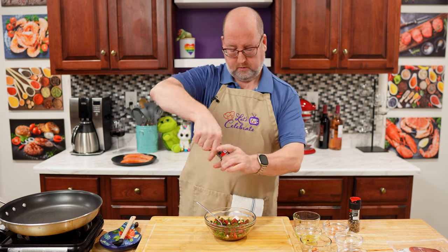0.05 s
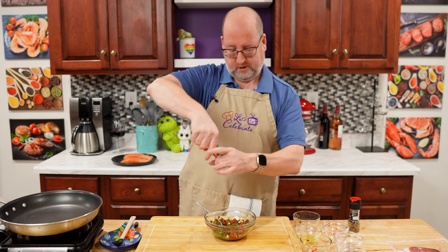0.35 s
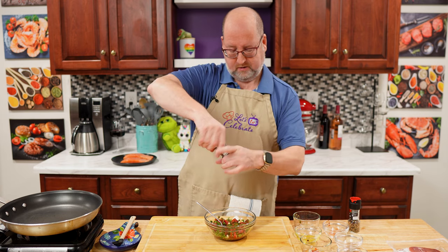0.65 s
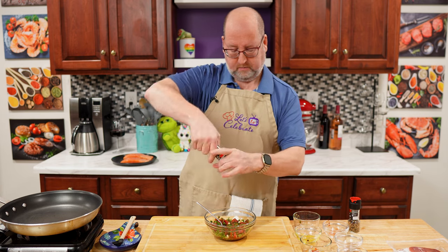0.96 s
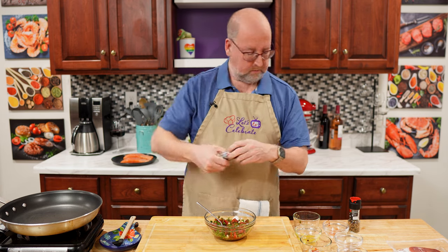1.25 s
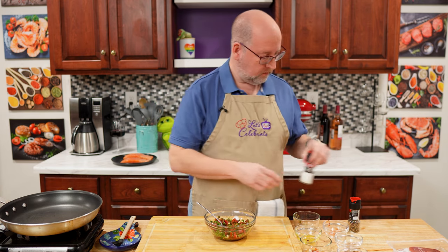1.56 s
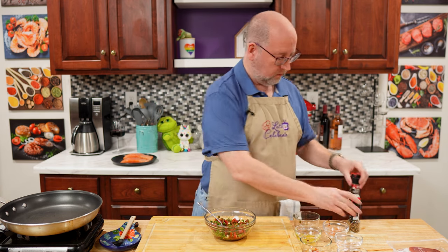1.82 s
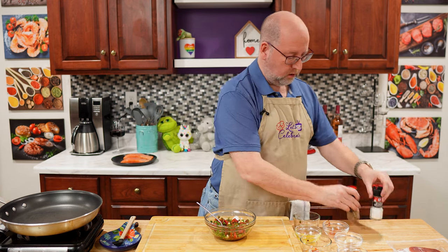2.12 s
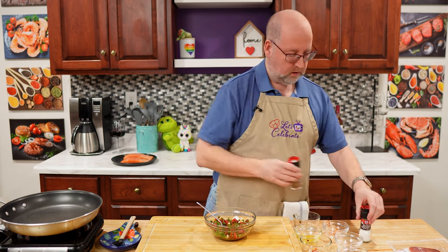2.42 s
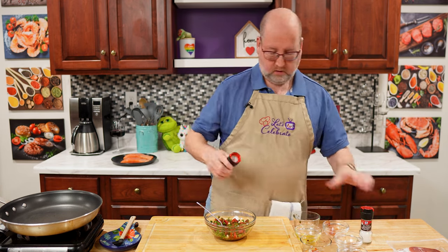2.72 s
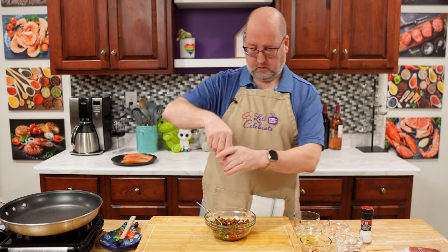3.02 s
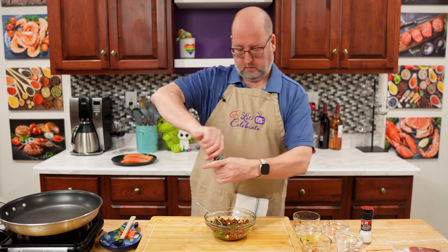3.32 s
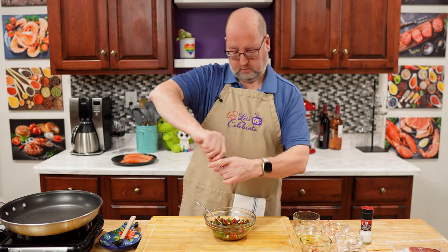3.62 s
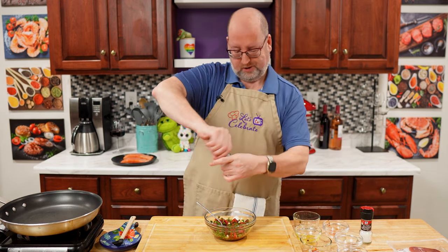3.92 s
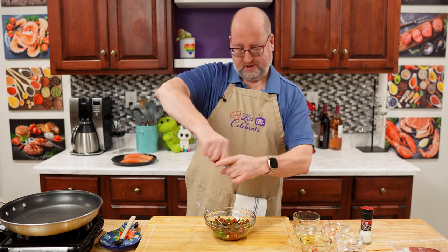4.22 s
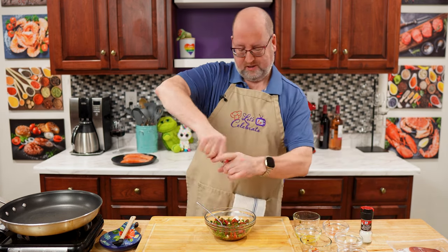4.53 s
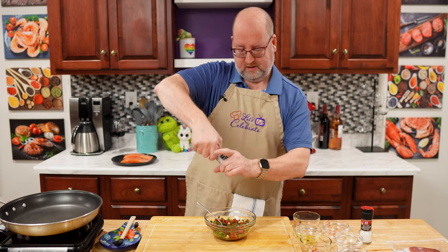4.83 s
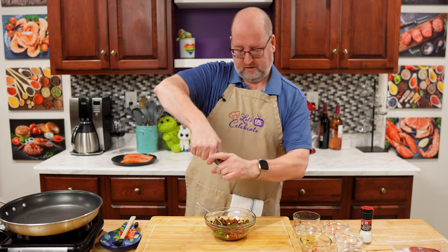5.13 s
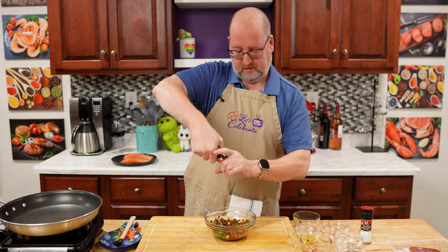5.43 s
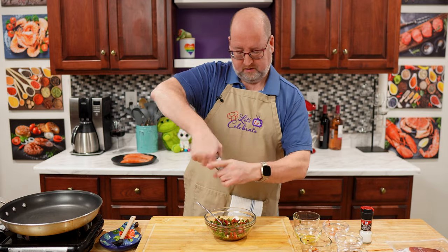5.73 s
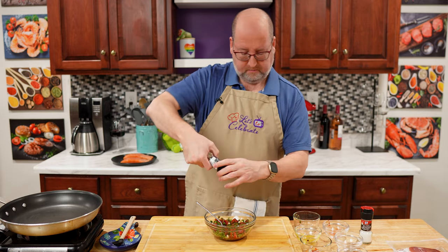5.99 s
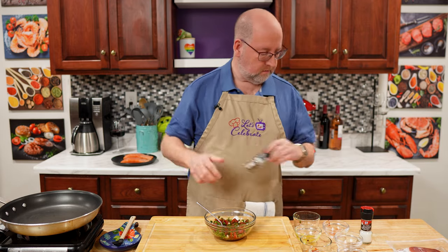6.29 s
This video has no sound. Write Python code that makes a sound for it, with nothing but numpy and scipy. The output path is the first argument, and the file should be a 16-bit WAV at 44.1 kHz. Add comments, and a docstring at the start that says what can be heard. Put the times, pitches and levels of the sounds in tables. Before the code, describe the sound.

Close twists of a pepper mill, a knock on wood, then a longer run of crackling salt mill turns amid soft cloth rustle.

```python
"""A pepper mill grinds close to a microphone on a cook's apron, in a kitchen with a short ring.
The cook sets it down with the salt mill on a wooden board a little farther off, then takes up the
salt mill and twists that. Each turn crushes a stream of grit, broken by the cracks of whole grains
that jolt the mill; fingers slip on the cap between turns. A jar clinks softly, and the apron
rustles right at the microphone as the arms move."""
import sys
import numpy as np
from scipy import signal
from scipy.fft import rfft, irfft, next_fast_len
from scipy.io import wavfile

SR = 44100
rng = np.random.default_rng(int(sys.argv[2]) if len(sys.argv) > 2 else 0)


def to_wav(s):
    """Save 16-bit WAV."""
    ch = np.atleast_2d(s).T  # columns
    pcm = np.round(np.clip(ch, -1, 1) * 32767)  # PCM
    wavfile.write(sys.argv[1], SR, pcm.astype(np.int16))


N = 280278
TIME = np.arange(N) / SR

# Levels in the tables are relative, within each layer.
# Turns of the cap, its hollow ring and the finger slip ahead of each turn:
# start_s, end_s, grit_db, cap_hz, cap_db, slip_lead_s, slip_db
PEPPER_TWISTS = [(0.036, 0.092, -16, 2160, -22, 0.042, -36), (0.308, 0.374, -16.5, 2170, -22, 0.072, -41.5),
                 (0.565, 0.637, -16, 2100, -27, 0.057, -36), (0.849, 0.92, -17.5, 2020, -27, 0.06, -37)]
SALT_TWISTS = [(3.035, 3.106, -37, 3080, -25, 0.023, -39), (3.398, 3.445, -22, 1580, -18, 0.029, -43),
               (3.736, 3.79, -25, 3000, -24, 0.087, -43), (4.022, 4.053, -20, 2250, -23, 0.057, -32),
               (4.27, 4.344, -24.5, 1860, -16, 0.051, -30), (4.588, 4.628, -21, 2220, -17, 0.08, -29.5),
               (4.826, 4.886, -22, 2150, -45, 0.044, -37), (5.13, 5.146, -21, 1687, -54, 0.045, -26.5),
               (5.427, 5.499, -24.5, 1640, -17, 0.069, -34),
               (5.761, 5.831, -22.5, 1760, -14.5, 0.073, -38.5)]
# The loudest grains breaking: time_s, crack_db, jolt_db
PEPPER_LOUD_CRACKS = [(0.0156, -13.5, -41), (0.0344, -22, -36.5), (0.053, -14, -45), (.3203, -14, -51),
                      (.328, -11.5, -41), (.352, -13, -43), (.553, -12, -27.5), (0.5973, -16, -48),
                      (.8464, -14.5, -50), (0.87, -10, -39), (0.9419, -16.5, -44)]
SALT_LOUD_CRACKS = [(3.063, -26.5, -41), (3.087, -25.5, -48), (3.397, -12, -28), (3.417, -8, -20),
                    (3.4376, -13, -50), (3.446, -11, -39), (3.7302, -8.5, -14.5), (3.7467, -10.5, -33),
                    (3.7814, -12.5, -61), (4.0014, -16.5, -41), (4.0284, -6.5, -34), (4.046, -17, -25.5),
                    (4.2536, -8, -20.5), (4.263, -12.5, -35), (4.2808, -8, -39), (4.3008, -12, -38),
                    (4.3074, -11.5, -25.5), (4.319, -10, -21.5), (4.3291, -12.5, -48), (4.5811, -17, -37),
                    (4.59, -11.5, -43), (4.6134, -12, -37), (4.8212, -5.5, -17), (4.86, -14.5, -50),
                    (4.87, -17, -55), (4.9099, -10.5, -40), (5.1325, -7, -29.5), (5.1493, -11.5, -23),
                    (5.4156, -9, -27), (5.4208, -8, -31.5), (5.437, -11.5, -34), (5.4515, -12, -46),
                    (5.46, -14.5, -51), (5.4888, -10.5, -35), (5.759, -10, -51), (5.766, -11, -37),
                    (5.7938, -11.5, -47), (5.8014, -11.5, -26.5), (5.829, -10, -29)]
# Colour of each mill from close by: frequency_hz, level_db
PEPPER_COLOUR = [(100, -38), (800, -22), (1080, -18), (1350, -4.5), (1650, -6), (2050, -1), (3200, 0),
                 (5200, -1.5), (7100, -0.5), (8500, 0), (11000, 1.5), (13500, -3), (16000, -4.5)]
SALT_COLOUR = [(100, -17.5), (800, -20.5), (1100, -17.5), (1400, -2.5), (1800, -2.5), (2200, -1),
               (3100, -4), (4000, -5), (5500, 0.5), (7300, -1.5), (9300, 2), (12000, -1.5), (13500, -4.5),
               (16000, -9.5)]
# Short rings of the burr: pitch_hz, width_hz, level_db
BURR_MODES = [(3100, 290, -23), (4440, 390, -29), (7290, 190, -22), (9100, 300, -25)]
# Mills touching and landing on the board: time_s, level_db, low_cut_hz, high_cut_hz
BOARD_KNOCKS = [(1.748, -32, 700, 2300), (2.024, -15, 382, 700), (2.041, -4.5, 466, 2120),
                (2.4459, 3, 111, 1920)]
# Modes of the wooden board: pitch_hz, level_db, t60_s
BOARD_MODES = [(184.7, -19.5, 0.17), (208, -44, 0.15), (238, -34, 0.2), (359.3, -29, 0.61),
               (408, -22.5, 0.27), (486.4, -17.5, 0.15), (533, -16, 0.083), (595, -20.5, 0.18),
               (640, -21, 0.16), (663, -23.5, 0.18), (745, -27, 0.18), (813, -26, 0.2), (930, -22, 0.068),
               (1092, -19, 0.04), (1330, -22, 0.045), (1470, -23.5, 0.029), (1640, -23, 0.037),
               (1714, -13.5, 0.013), (3040, -17.5, 0.019)]
# The counter's many close resonances: frequency_hz, level_db
COUNTER_COLOUR = [(120, -21), (185, -1), (300, -11), (420, -0.5), (580, 2), (760, -6.5), (1100, -10.5),
                  (1400, -25), (1800, -29), (2600, -24), (6000, -33)]
# Clicks and scuffs of the mills in the hand: start_s, length_s, level_db
HAND_CLICKS = [(.7257, .003, -29), (2.076, 0.0091, -29), (2.1186, 0.0017, -21.5), (3.16, 0.0026, -32),
               (3.368, 0.013, -28), (3.68, 0.025, -33.5), (4.555, 0.0034, -23.5), (5.3835, 0.0021, -24)]
# Colour of those clicks: frequency_hz, level_db
CLICK_COLOUR = [(500, -17), (2000, -0.5), (3800, -1), (6000, -1), (9500, 4.5), (12500, 0), (16000, -1.5)]
# Long slides of a hand along a mill: start_s, end_s, level_db, pitch_hz, width_hz
HAND_SLIDES = [(1.098, 1.206, -37, 4600, 1120), (1.302, 1.45, -42, 8840, 1100),
               (1.44, 1.479, -37, 9200, 1100), (2.963, 3.175, -41.5, 9500, 800),
               (6.273, 6.35, -36.5, 10460, 250)]
# Thin squeaks as the mill is lowered: start_s, level_db
MILL_SQUEAKS = [(6.26, -25), (6.291, -27)]
# A jar clinks, a hand rubs off it: start_s, end_s, fall_s, level_db
JAR_CONTACTS = [(2.118, 2.118, 0.036, -39.5), (2.145, 2.147, 0.012, -41), (2.746, 2.79, 0.036, -47)]
# Ring of the jar: pitch_hz, width_hz, level_db
JAR_MODES = [(1240, 180, 5), (3350, 180, -2), (4130, 180, -3), (4450, 200, -5)]
# Reaches of the arms, each swelling and fading: middle_s, half_length_s, hiss_db, rumble_db
ARM_REACHES = [(1.182, 0.086, -44.5, -52), (1.36, 0.21, -49.5, -53.5), (1.794, .1, -44, -46),
               (2.307, .11, -43, -44), (2.662, 0.2, -50.5, -46.5), (3.257, 0.043, -41, -44.5),
               (6.062, 0.065, -46.5, -54), (6.295, 0.11, -44, -49.5)]
# Soft bumps of the arm on the apron: time_s, level_db
APRON_BUMPS = [(1.689, -37.5), (3.228, -54)]
# Colour of the cloth's hiss and of the rumble at the microphone: frequency_hz, level_db
APRON_COLOUR = [(300, -1), (1200, -5.5), (3000, -5.5), (5500, -4.5), (9000, -0.5), (12500, 1),
                (16000, -1.5)]
MIC_RUMBLE_COLOUR = [(20, -42), (45, -14), (75, -0.5), (125, 0), (180, -2.5), (280, -9.5), (420, -6.5),
                     (700, -13.5), (1100, -20), (1700, -19.5), (3000, -30), (8000, -45)]
# Ring of the kitchen: frequency_hz, t60_s
KITCHEN_DECAY = [(150, 0.56), (700, 0.41), (1700, 0.48), (4000, 0.41), (9000, 0.29), (15000, 0.2)]


def pepper_mill():
    """Close up, peppercorns crumble into a dense, even crunch."""
    cracks = breaking(PEPPER_TWISTS, PEPPER_LOUD_CRACKS, length_s=0.0047, per_s=100,
                      small_db=-1, spread_db=2.5, jolt_db=-29.5)
    crunch = grinding(PEPPER_TWISTS, cracks, PEPPER_COLOUR, crack_db=-2, steady_db=-2,
                      bite_db=-11.5, lead_in_s=0.013, run_out_s=0.022)
    return crunch + jolts(cracks, thud_hz=88.4, thud_db=6,
                          clack_hz=666, clack_t60_s=0.008, clack_db=-1, shell_db=-2)


def salt_mill():
    """Just as close, hard crystals give sharper cracks that shake the mill."""
    cracks = breaking(SALT_TWISTS, SALT_LOUD_CRACKS, length_s=0.0026, per_s=120,
                      small_db=4.5, spread_db=7.5, jolt_db=-30.5)
    crunch = grinding(SALT_TWISTS, cracks, SALT_COLOUR, crack_db=-1.5, steady_db=0,
                      bite_db=-9, lead_in_s=0.025, run_out_s=0.027)
    return crunch + jolts(cracks, thud_hz=89, thud_db=1.5,
                          clack_hz=700, clack_t60_s=0.0098, clack_db=-0.5, shell_db=8.5)


def breaking(turns, loudest, length_s, per_s, small_db, spread_db, jolt_db):
    """Small grains crack unevenly among the loud ones; gives time_s, length_s, crack_db, jolt_db."""
    count, margin_s, fade_db_per_s = 24, 0.02, 600  # cracks spill past each turn, fading
    cracks = [(s, length_s, db, jolt) for s, db, jolt in loudest]
    for start, end, grit_db, *_ in turns:
        moments = start - margin_s + (np.arange(count) + rng.random(count)) / per_s
        outside_s = np.maximum(np.maximum(start - moments, moments - end), 0)
        scatter_db = spread_db * (2 * rng.random(count) - 1)
        levels = grit_db + small_db + scatter_db - fade_db_per_s * outside_s
        cracks += [(s, length_s / 2, db, db + jolt_db)
                   for s, db in zip(moments, levels) if 0 < s < end + margin_s]
    return cracks


def grinding(turns, cracks, spectrum, crack_db, steady_db, bite_db, lead_in_s, run_out_s):
    """Grit crumbles through each turn, lightly as the burr bites and runs out; whole grains burst."""
    crush = np.zeros(N)
    for start, end, grit_db, *_ in turns:
        bite = from_db(bite_db) * gate(start, end, lead_in_s, run_out_s)
        crush += from_db(grit_db) * (gate(start, end, 0.0032, 0.0095) + bite)
    grit = crush * grains(13000, spread_db=3.5) * crumbling(240, fall_s=0.0011, steady_db=steady_db)
    snaps = bursts(cracks, fall_s=0.00073) * grains(26000, spread_db=2.5)
    crunch = from_db(-3) * grit + from_db(crack_db) * snaps
    burr = sum(from_db(db) * resonance(crunch, hz, width) for hz, width, db in BURR_MODES)
    out = colour(crunch + burr, spectrum)
    for start, end, _, cap_hz, cap_db, *_ in turns:  # each new grip retunes the hollow of the cap
        turn = slice(max(round((start - 0.1) * SR), 0), round((end + 0.1) * SR))
        out[turn] += from_db(cap_db) * resonance(crunch[turn], cap_hz, width_hz=220)
    return out


def jolts(cracks, thud_hz, thud_db, clack_hz, clack_t60_s, clack_db, shell_db):
    """When a grain gives way the burr jumps: the hand-held mill thuds and its shell rattles."""
    shakes = [(s, length, jolt_db) for s, length, _, jolt_db in cracks]
    kicks = np.zeros(N)
    for s, _, db in shakes:
        kicks[round(s * SR)] += from_db(db)
    rattle = bursts(shakes, fall_s=0.0013) * rng.standard_normal(N)
    shell = butterworth(rattle, [200, 1250], "band")
    thud = ring(kicks, thud_hz, t60_s=0.032) - from_db(-2.5) * ring(kicks, hz=171, t60_s=0.016)
    clack = ring(kicks, clack_hz, clack_t60_s) - ring(kicks, hz=378, t60_s=0.011)
    return from_db(thud_db) * thud + from_db(clack_db) * clack + from_db(shell_db) * shell


def board():
    """A mill lands on the board: a blunt push, the wood's modes and a wash from the counter beneath."""
    out = np.zeros(N)
    counter = colour(rng.standard_normal(N), COUNTER_COLOUR)
    age = TIME[:SR // 2]
    push = 1.0 * (age == 0)
    modes = sum((-1) ** k * from_db(db) * ring(push, hz, t60)
                for k, (hz, db, t60) in enumerate(BOARD_MODES))
    wood = modes - from_db(-1.5) * ring(push, hz=660, t60_s=0.006)
    for s, db, low_cut_hz, high_cut_hz in BOARD_KNOCKS:
        at = round(s * SR)
        wash = counter[at:at + len(age)] * from_db(-17 - 60 * age / 0.27)
        blow = butterworth(wood + wash, low_cut_hz, "high")  # a light touch leaves the low modes still
        blow = butterworth(blow, high_cut_hz, "low", order=4)  # a blunt one leaves out the high ones
        out[at:at + len(age)] += from_db(db) * blow
    return out


def hands():
    """Small clicks, the high swish of skin catching and sliding on the mill, and a double squeak."""
    clicks = colour(bursts(HAND_CLICKS, fall_s=0.00099) * grains(20000, spread_db=5), CLICK_COLOUR)
    slip_gap_s = 0.033  # the fingers find their new grip this long before a turn
    regrips = sum(from_db(db) * gate(start - lead_s, start - slip_gap_s, 0.002, 0.0044)
                  for start, *_, lead_s, db in PEPPER_TWISTS + SALT_TWISTS)
    strokes = sum(from_db(db) * gate(start, end, 0.008, 0.008) * resonant_noise(hz, width)
                  for start, end, db, hz, width in HAND_SLIDES)
    skin = regrips * resonant_noise(hz=10560, width_hz=1600) + strokes
    catching = crumbling(48, fall_s=0.0013, steady_db=-3)
    swish = from_db(-6) * butterworth(skin * catching, 6500, "high")
    squeak_level = sum(from_db(db) * gate(s, s + 0.003, 0.001, 0.012) for s, db in MILL_SQUEAKS)
    squeaks = squeak_level * resonant_noise(hz=14900, width_hz=160)
    return clicks + (swish + squeaks) * flicker(250, spread_db=1.23)


def jar():
    """A nearby jar's few resonances ring softly under the fingers."""
    touch = sum(from_db(db) * gate(start, end, (end - start) / 4, fall)
                for start, end, fall, db in JAR_CONTACTS)
    ringing = sum(from_db(db) * resonant_noise(hz, width) for hz, width, db in JAR_MODES)
    return touch * unit_power(ringing)


def apron():
    """Arms rub and bump the cloth; long reaches also rumble at the microphone, over the quiet room."""
    rest_hiss_db, rest_rumble_db, twist_hiss_db = -54, -56.5, -49
    twists = sum(swell((start + end) / 2, half_s=0.14) ** 2
                 for start, end, *_ in PEPPER_TWISTS + SALT_TWISTS)
    hiss_power = from_db(rest_hiss_db) ** 2 + from_db(twist_hiss_db) ** 2 * twists
    rumble_power = np.full(N, from_db(rest_rumble_db) ** 2)
    for middle_s, half_s, hiss_db, rumble_db in ARM_REACHES:
        motion = swell(middle_s, half_s)
        hiss_power += (from_db(hiss_db) * motion) ** 2
        rumble_power += (from_db(rumble_db) * motion) ** 2
    fibres = colour(grains(16000, spread_db=7), APRON_COLOUR) * flicker(60, spread_db=1.2)
    rumble = colour(rng.standard_normal(N), MIC_RUMBLE_COLOUR) * flicker(30, spread_db=0.64)
    bump_level = sum(from_db(db) * gate(s, s, 0.0018, 0.018) for s, db in APRON_BUMPS)
    bumps = bump_level * resonant_noise(hz=139, width_hz=40)
    return np.sqrt(hiss_power) * fibres + np.sqrt(rumble_power) * rumble + bumps


def kitchen(x, wet_db):
    """Diffuse reflections reach the microphone a few milliseconds late and die sooner in the treble."""
    age, edges_hz = TIME[:SR * 2 // 3], np.geomspace(100, 18000, 9)
    response = np.zeros(len(age))
    for low, high in zip(edges_hz, edges_hz[1:]):
        band = butterworth(rng.standard_normal(len(age)), [low, high], "band")
        t60_s = at_hz(KITCHEN_DECAY, np.sqrt(low * high))
        response += band * from_db(-60 * age / t60_s)
    response *= np.clip(age / 0.0036 - 1, 0, 1)
    response /= np.sqrt(np.sum(response ** 2))
    return from_db(wet_db) * signal.fftconvolve(x, response)[:N]


def grains(per_s, spread_db):
    """Tiny fractures at random moments, of uneven size; unit power."""
    sizes = uneven_sizes(spread_db) * rng.choice([-1, 1], N)
    return unit_power(sizes * (rng.random(N) < per_s / SR))


def crumbling(per_s, fall_s, steady_db):
    """Each small collapse starts at once and trickles away, over a steady rub; unit power."""
    moments = (np.cumsum(rng.uniform(0.25, 1.75, 4000)) * SR / per_s).astype(int)
    collapses = np.zeros(N)
    collapses[moments[moments < N]] = 1
    collapses *= uneven_sizes(spread_db=2.6)
    trickle = signal.lfilter([1], [1, -np.exp(-1 / (fall_s * SR))], collapses + 1e-18)
    return unit_power(trickle + from_db(steady_db))


def uneven_sizes(spread_db):
    """A random gain for every sample, held within twice the spread."""
    return from_db(spread_db * np.clip(rng.standard_normal(N), -2, 2))


def bursts(rows, fall_s):
    """Envelope of sudden bursts from rows that begin start_s, length_s, level_db."""
    power, age = np.zeros(N), TIME[:SR // 20]
    for s, length, db, *_ in rows:
        at = round(s * SR)
        shape = from_db(db) * np.exp(-np.maximum(age - length, 0) / fall_s)
        power[at:at + len(age)] += shape[:N - at] ** 2
    return np.sqrt(power)


def gate(start, end, rise_s, fall_s):
    """Full between start and end, with exponential flanks."""
    before = np.maximum((start - TIME) / max(rise_s, 1e-12), 0)
    after = np.maximum((TIME - end) / fall_s, 0)
    return np.exp(-np.minimum(before + after, 20))


def swell(middle_s, half_s):
    """A smooth rise and fall of height 1."""
    return np.exp(-np.minimum(((TIME - middle_s) / half_s) ** 2, 40) / 2)


def flicker(per_s, spread_db):
    """A gain that wanders at random, about per_s times a second."""
    wander = np.interp(TIME * per_s, np.arange(N), rng.standard_normal(N))
    return from_db(spread_db * unit_power(wander))


def ring(clicks, hz, t60_s):
    """A unit click sets a decaying sine of height 1 ringing."""
    r, w = from_db(-60 / (t60_s * SR)), 2 * np.pi * hz / SR
    return signal.lfilter([0, np.sin(w)], [1, -2 * r * np.cos(w), r * r], clicks + 1e-18)


def resonance(x, hz, width_hz):
    """One resonance that keeps the power of white noise."""
    r, w = np.exp(-np.pi * width_hz / SR), 2 * np.pi * hz / SR
    gain = np.sqrt((1 - r * r) / 2)
    return signal.lfilter([gain, 0, -gain], [1, -2 * r * np.cos(w), r * r], x + 1e-18)


def resonant_noise(hz, width_hz):
    """Noise through one resonance; unit power."""
    return resonance(rng.standard_normal(N), hz, width_hz)


def colour(x, spectrum):
    """Causal (minimum-phase) filter that keeps the power of white noise."""
    size = next_fast_len(N + 8192, True)
    gain = unit_power(from_db(at_hz(spectrum, np.arange(size // 2 + 1) * SR / size)))
    cepstrum = irfft(np.log(gain), size)
    cepstrum[1:size // 2] *= 2
    cepstrum[size // 2 + 1:] = 0
    return irfft(rfft(x, size) * np.exp(rfft(cepstrum)), size)[:N]


def butterworth(x, hz, kind, order=2):
    """A plain low, high or band pass."""
    return signal.sosfilt(signal.butter(order, hz, kind, fs=SR, output="sos"), x)


def at_hz(points, hz):
    """Read a table on a log-frequency axis."""
    frequencies, values = np.transpose(points)
    return np.interp(np.log(np.maximum(hz, 1)), np.log(frequencies), values)


def from_db(db):
    """Decibels to gain."""
    return 10 ** (np.asarray(db) / 20)


def unit_power(x):
    """Scale to a mean square of 1."""
    return x / np.sqrt(np.mean(x ** 2) + 1e-20)


def scene():
    """Mills, hands and jar are near the microphone; the board, a little farther, carries more room."""
    near = pepper_mill() + salt_mill() + hands() + jar()
    knocks = board()
    room = kitchen(near, wet_db=-16.5) + kitchen(knocks, wet_db=-10)
    return (near + knocks + room + apron())[None]


def record(dry):
    """The mono microphone sheds the deep bass and the very top; the loudest peaks are rounded off."""
    ceiling, bass_cut_hz, top_cut_hz = 0.78, 52, 15900
    top_cut = signal.ellip(12, 0.1, 80, top_cut_hz, fs=SR, output="sos")
    heard = signal.sosfilt(top_cut, butterworth(dry, bass_cut_hz, "high"))
    rounded = heard / (1 + (heard / ceiling) ** 4) ** (1 / 4)
    return signal.sosfiltfilt(top_cut, rounded)


dry = scene()
out = record(dry)
to_wav(out)
```